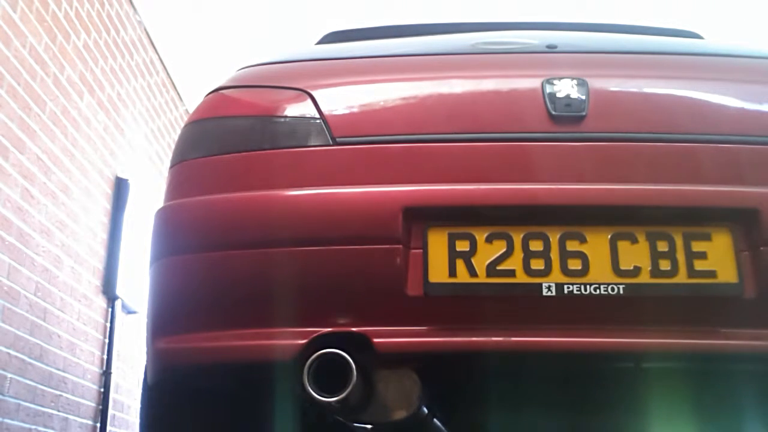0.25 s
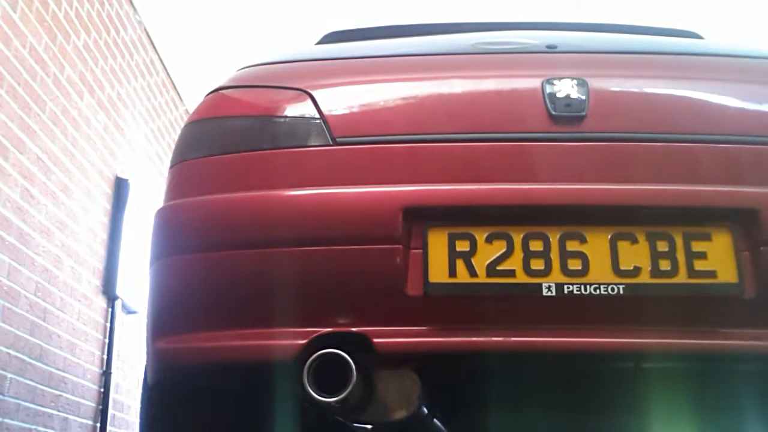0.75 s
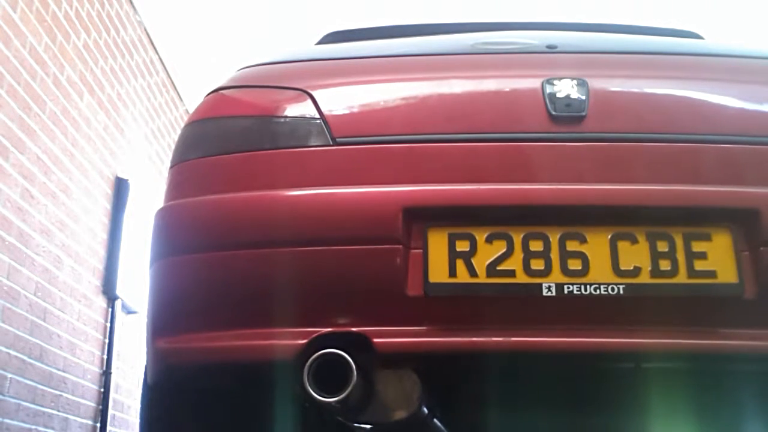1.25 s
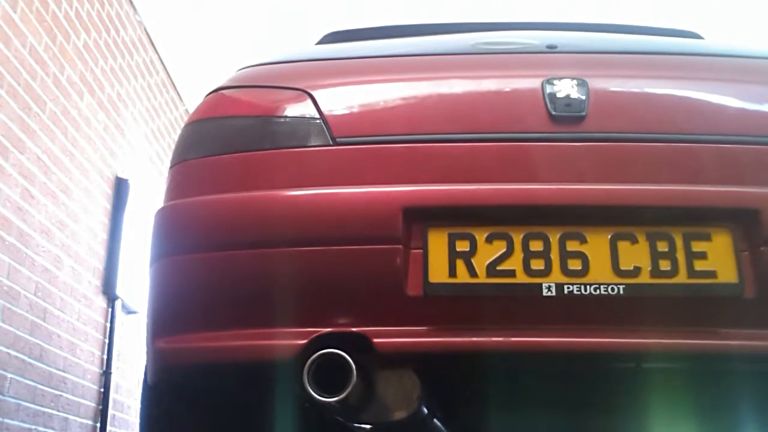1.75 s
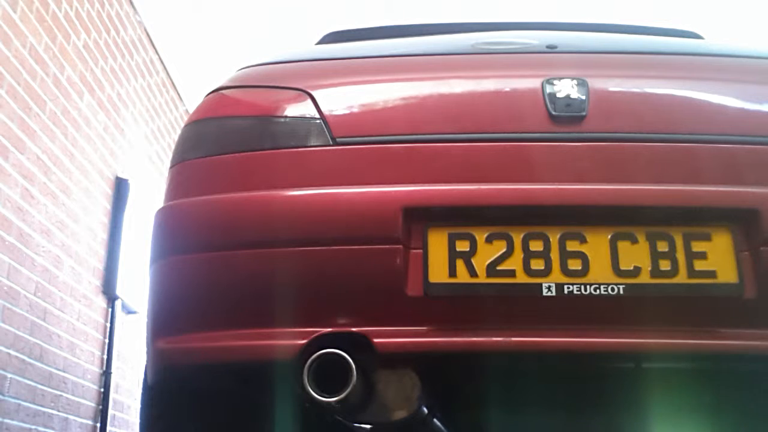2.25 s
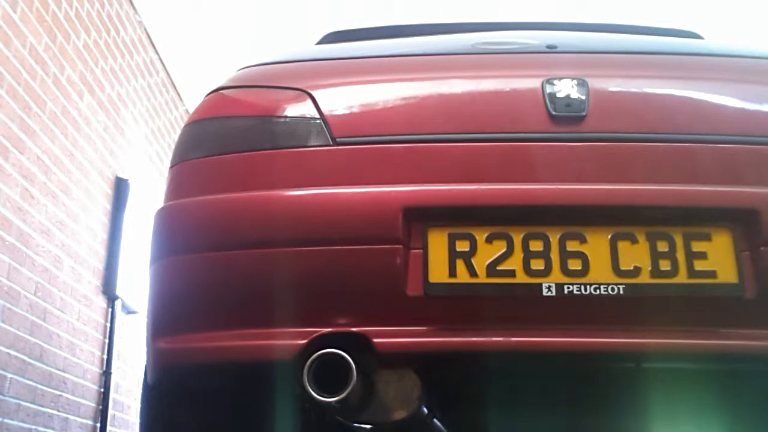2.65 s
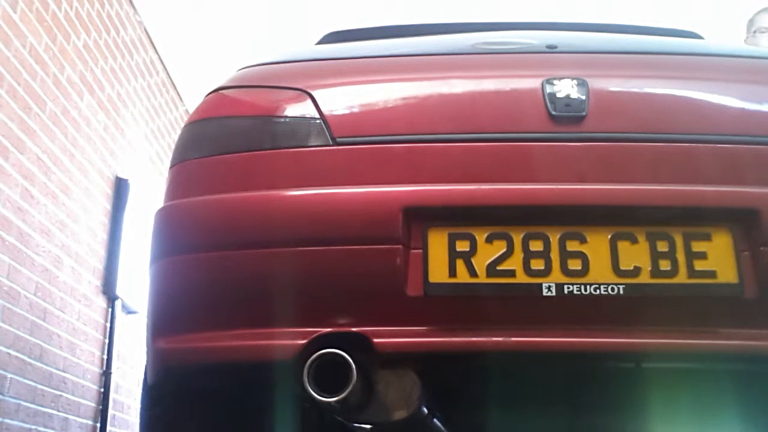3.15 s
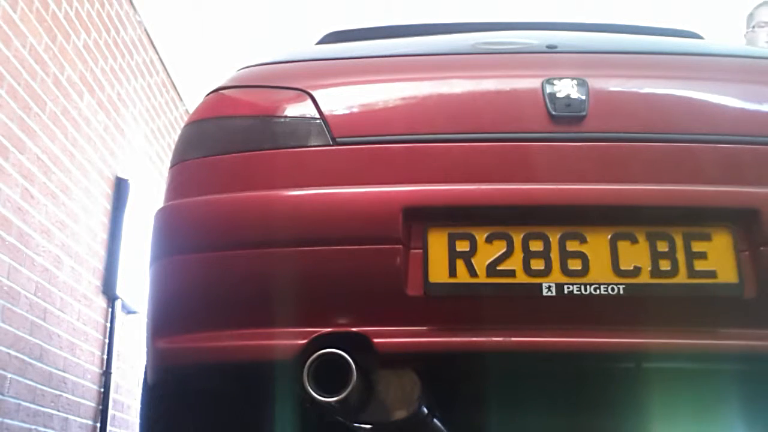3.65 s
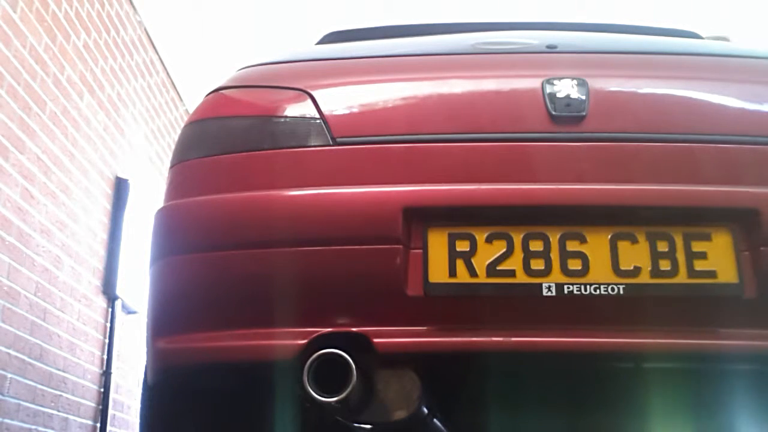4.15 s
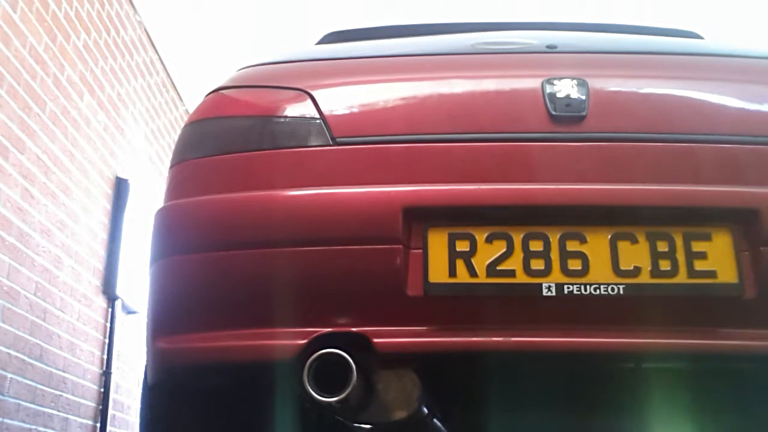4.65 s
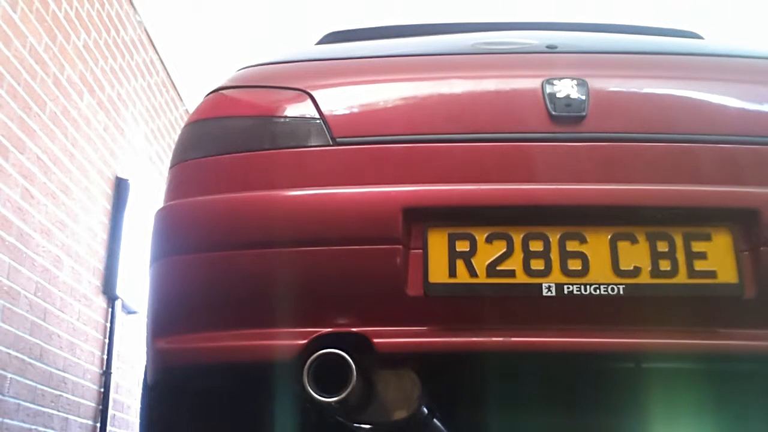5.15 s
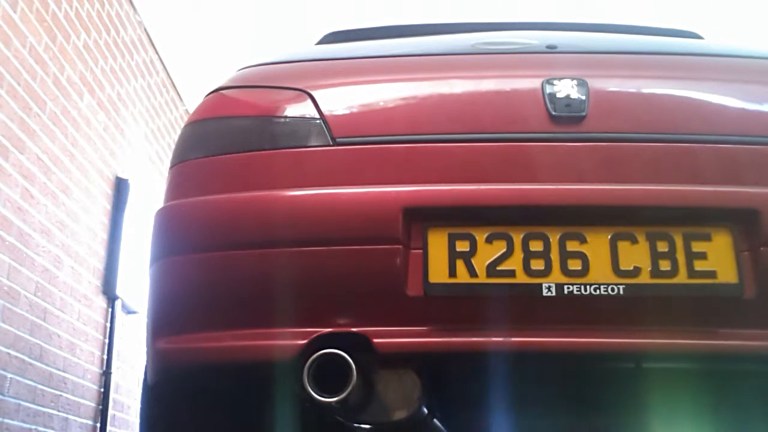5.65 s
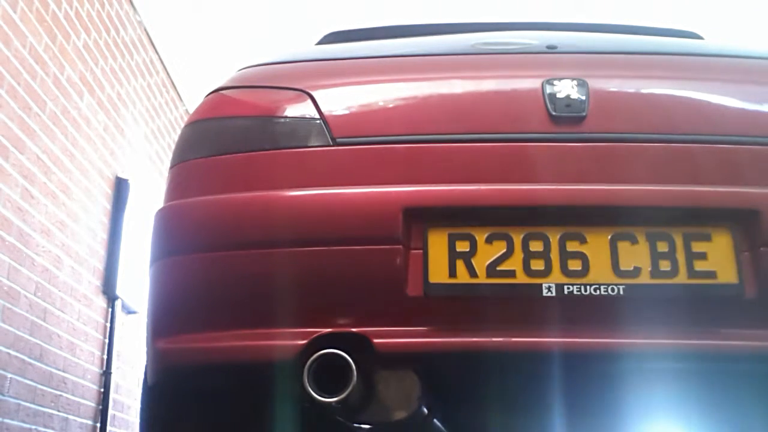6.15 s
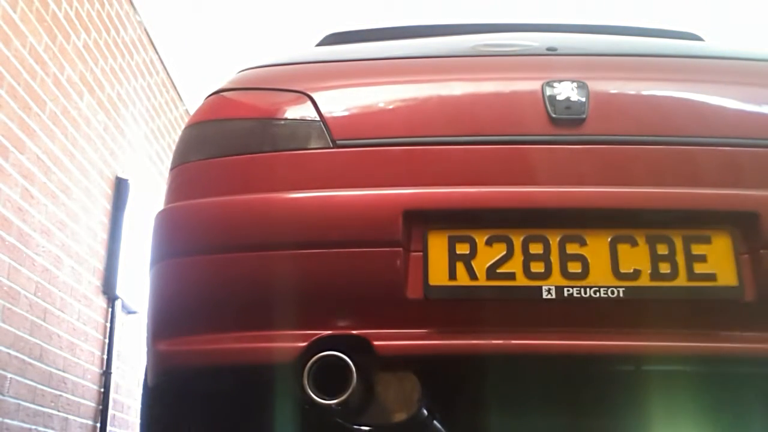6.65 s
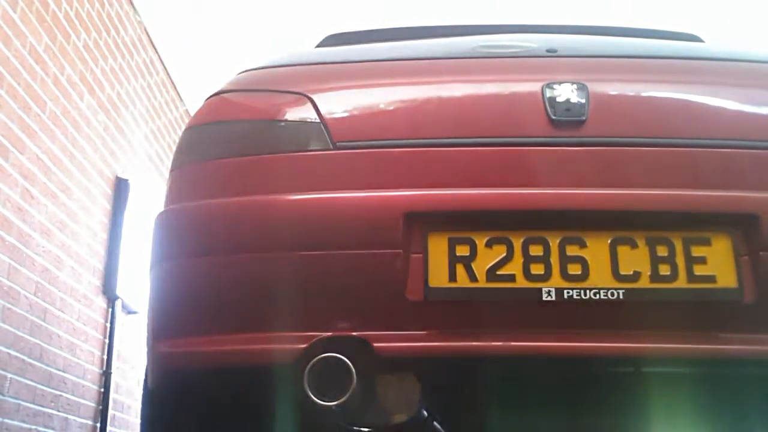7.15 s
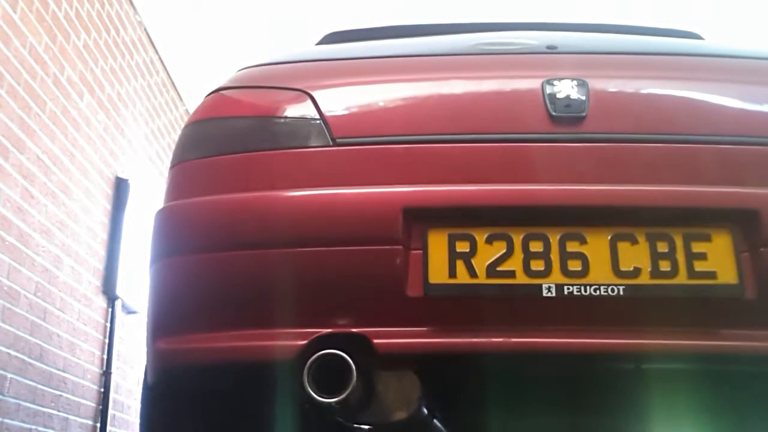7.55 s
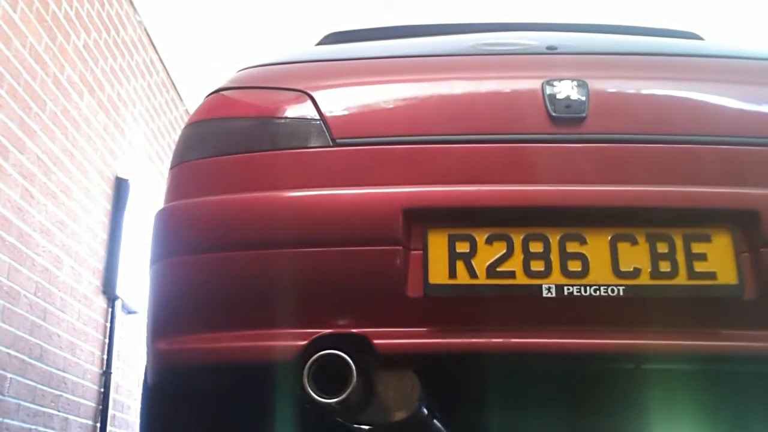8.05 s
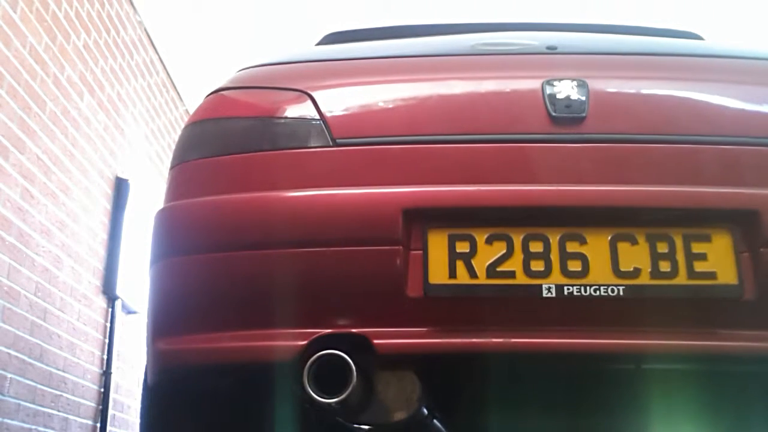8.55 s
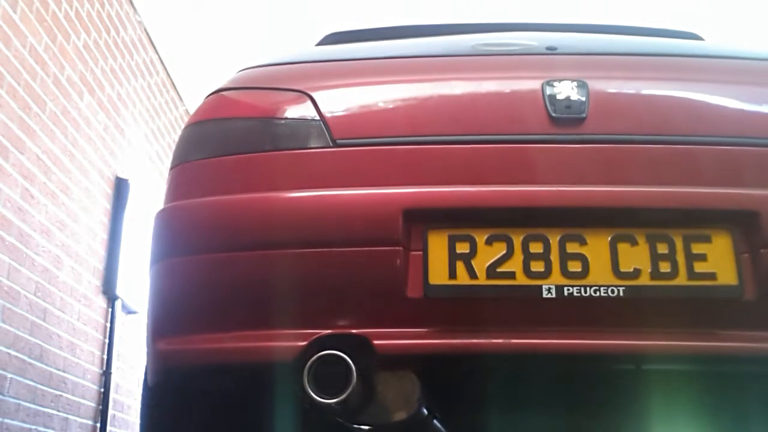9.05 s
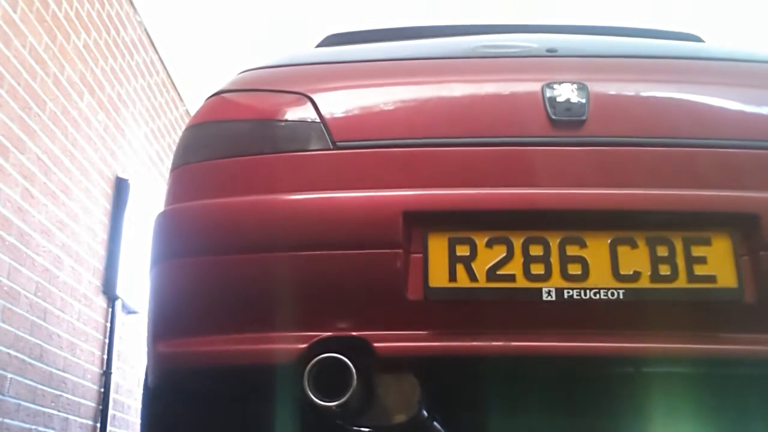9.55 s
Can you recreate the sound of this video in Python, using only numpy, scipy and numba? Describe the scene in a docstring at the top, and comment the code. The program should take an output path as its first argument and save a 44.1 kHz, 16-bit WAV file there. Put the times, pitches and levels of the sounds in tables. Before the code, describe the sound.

A starter motor labours with gritty gear whine, then short exhaust pops merge into a running engine. It flares mildly, drops to an even, bassy, puttering idle with soft gas hiss and faint valve rattle, then leaps into a harsh raspy rev, winds down, and climbs a second time. Microphone right behind the exhaust by a wall, clipping on the loudest bursts; slight stereo spread.

```python
"""The exhaust of a small four-cylinder car, close behind its tailpipe beside a brick wall: it catches, flares,
idles and is revved twice. Each firing is a pulse that feeds tuned bands and rings the exhaust; sine lines add growl.
Gas and valve gear are ringing noise that throbs with the firings. Before that a starter cranks: noise in strokes.
The level jumps up briefly; the loudest parts overload the microphone input, and gain control pulls the level down."""
import sys
import numpy as np
from scipy import signal
from scipy.io import wavfile
from scipy.ndimage import uniform_filter1d
from numba import njit

SR = 44100
rng = np.random.default_rng(int(sys.argv[2]) if len(sys.argv) > 2 else 0)


def master_out(mix):
    """Clip the mix to full scale and print it as 16-bit PCM to the path in sys.argv[1]."""
    frames = np.transpose(np.atleast_2d(mix))
    ceiling = np.clip(frames, -1, 1)
    pcm = np.round(ceiling * 32767).astype(np.int16)
    wavfile.write(sys.argv[1], SR, pcm)


N = 432621
ONE = np.ones(N)
T = np.arange(N) / SR  # time in seconds


def undb(db):
    """Decibels to gain."""
    return 10 ** (np.asarray(db) / 20)


def unit(x):
    """Scale to rms 1."""
    return x / np.sqrt(np.mean(x ** 2))


@njit
def svf(x, hz, width):
    """State-variable band-pass with moving centre and width, gain 1 at the centre."""
    y, band, low = np.empty(len(x)), 0., 0.
    for i in range(len(x)):
        g, k = np.pi * hz[i] / SR, width[i] / hz[i]
        g += g ** 3 / 3  # close to the tangent that a digital filter needs
        v = (band + g * (x[i] - low)) / (1 + g * (g + k))
        band, low, y[i] = 2 * v - band, low + 2 * g * v, k * v
    return y


@njit
def follow(x, attack, release):
    """Level follower with separate rise and fall, each a share of the gap per sample."""
    level, out = 0., np.empty(len(x))
    for i in range(len(x)):
        level += (x[i] - level) * (attack if x[i] > level else release)
        out[i] = level
    return out


def fixed_band(x, hz, width):
    """Band-pass that stays at one pitch."""
    return svf(x, hz * ONE, width * ONE)


def band_noise(hz, width):
    """Noise in one fixed band, rms 1."""
    return unit(fixed_band(rng.standard_normal(N), hz, width))


def low_pass(x, order, hz):
    """Take away the treble above a pitch."""
    return signal.sosfilt(signal.butter(order, hz, fs=SR, output="sos"), x)


def dull(x):
    """The tailpipe passes little of a snap's treble."""
    return low_pass(x, 4, 2900)


def ring(x, modes):
    """Sum of resonances, neighbours in opposite phase."""
    total = 0
    for k, (hz, width, db) in enumerate(modes):
        total = total + (-1) ** k * undb(db) * fixed_band(x, hz, width)
    return total


def columns(rows):
    """Table columns joined by straight lines in time."""
    s, *cols = np.transpose(rows)
    return [np.interp(T, s, c) for c in cols]


def passed_db(hz, table):
    """How strongly a pitch gets through, read between the table's points on a log pitch scale."""
    table_hz, table_db = np.transpose(table)
    return np.interp(np.log(hz), np.log(table_hz), table_db)


def walk(rate):
    """Slow random wander, spread near 1."""
    k = int(SR / rate)
    steps = np.repeat(rng.standard_normal(N // k + 1), k)
    return 2.1 * uniform_filter1d(uniform_filter1d(steps, k), k)[:N]


def swell(s, rise, until, fade):
    """Rises to 1 at s, holds, then dies away."""
    return np.clip(1 + (T - s) / max(rise, .001), 0, 1) * np.exp(-np.maximum(T - until, 0) / fade)


WALL_LAG_S = .00045


def hiss(modes, shared, pan_db):
    """Noise in resonances for two ears; part of it is common and reaches the left a little late."""
    common, left, right = (unit(ring(rng.standard_normal(N), modes)) for _ in range(3))
    share = np.clip(shared, 0, 1)
    late = np.roll(common, int(WALL_LAG_S * SR))
    pair = np.sqrt(share) * np.array([late, common]) + np.sqrt(1 - share) * np.array([left, right])
    return pair * undb([[pan_db / 2], [-pan_db / 2]])


# The running engine. Each row: time in seconds, firing rate in Hz, then levels in dB of the note,
# the tailpipe rasp and the gas hiss.
RUN = [(1.09, 36.78, -4, -37, -30), (1.22, 45.77, -3, -30.5, -31), (1.35, 48.57, -4.5, -35, -33),
       (1.59, 51.46, -5, -36, -35), (1.85, 48.03, -4, -35, -34.5), (2.08, 43.74, -2, -37.5, -35),
       (2.41, 35.87, 0, -35.5, -33), (2.6, 31, 3, -45, -39), (2.74, 27.73, -5, -47, -37.5),
       (2.95, 28.12, -8, -45.5, -38), (3.3, 28.58, -1, -44.5, -38), (4.5, 29.52, 2, -44, -37.5),
       (6.37, 28.91, -0.5, -44.5, -36.5), (6.55, 30.07, 3, -44, -34.5), (6.65, 35.55, -1, -41.5, -38),
       (6.69, 38.13, -7.5, -30, -28), (6.81, 62.5, -1.5, -28, -30), (6.99, 108.6, -0.5, -22, -28),
       (7.09, 137.3, 1, -18.5, -28), (7.17, 160.2, -3.5, -23.5, -34.5), (7.28, 194.3, 10.5, -12.5, -27),
       (7.39, 206.9, 0, -18, -28), (7.45, 201.8, -5.5, -38, -27.5), (7.5, 198, -3, -21, -20),
       (7.62, 185.5, -4.5, -21, -20.5), (7.75, 176.5, -8.5, -22.5, -22.5), (7.98, 153.5, -1, -24.5, -23),
       (8.15, 142.6, -4, -24, -27), (8.27, 133.7, -2, -25, -24), (8.45, 119.3, -0.5, -23, -24.5),
       (8.61, 110.4, -1, -25, -24), (8.75, 99.7, -7.5, -32.5, -27), (8.95, 91.15, -4, -41, -26.5),
       (9.01, 91.75, -5.5, -19.5, -32), (9.14, 123.3, -2.5, -31, -29), (9.26, 156.9, 7, -17.5, -32.5),
       (9.38, 190.3, 7.5, -12, -26.5), (9.46, 210.1, 0, -16, -31.5), (9.59, 240.8, 1, -12.5, -29),
       (9.7, 239, -6, -19.5, -24), (9.81, 225, 2.5, -20, -18)]
# The balance at each speed. Each row: firing rate in Hz, tilt in dB an order, waver of the orders in dB,
# then levels in dB: half orders, silencer, valve gear above gas, buffeting, thump.
BY_SPEED = [(28.3, 1.5, .5, -25.5, -23, -10, -61, -48), (29.41, -1.5, 0.53, -35.5, -23.5, -7.5, -62.5, -45),
            (37.7, -1.5, .5, -23, -18.5, -11.5, -58, -39), (43.8, 0, .5, -36.5, -25.5, -10, -55, -25.5),
            (51, -2.5, .5, -46.5, -21, -8.5, -44, -28), (93, -1.5, 1.5, -22, -47, -8, -33.5, -44),
            (131, -2.5, 1, -30.5, -19, -5, -42, -45), (177, -5, 1.5, -20.5, -20, 2, -54, -53),
            (247.16, -5, 2.5, -16.5, -22, -0.5, -33, -54)]
# How the lines swell and fade. Each row: time in seconds, then changes in dB of the first, second, third
# and fourth order, the higher orders and the half orders.
LINES = [(1.2, 1, 0.5, -5, -8, 0, 6.5), (1.4, 3, 1.5, 1.0, -0.5, -5, 2.5), (1.6, -0.5, 3, 3.5, -2, 3, -1.0),
         (1.8, 4, 4, -2.5, -3.5, -12, 8), (2.0, -1, 1.0, -6, -9, -1.5, 6),
         (2.15, 1.0, 1.5, -2, -4, 8.5, 8.5), (2.3, 3, 1, 4.5, -5, 4, 1.5), (2.45, -0.5, 1.5, -3, 3, 3, 0),
         (2.6, 2, 2, 0, -6, -1.5, -4), (2.8, 3.5, 3, 1.5, 1.5, -1.5, -4), (3.0, 1.5, 5, 2.5, 4.5, -6, -1),
         (3.3, 4, 3, -0.5, 1, 2.5, -3.5), (4.5, -1, 2.0, 0, 1, 0, -0.0), (6.4, -1, 4.5, 0, 0.5, -2.5, 0),
         (6.75, -0.0, 1, -1, -4, 1, 3), (6.82, 7, -1, -4.5, -5, 3, -6), (6.89, -0.5, 3, 5, 1.0, -11, 4),
         (6.96, 1.5, 2.5, -1.5, 1.0, 0, -4), (7.03, 4, 3.5, -2.5, -6, 3, -2), (7.1, 1, 6.5, 2.5, -4, 0, -7),
         (7.17, 3.5, -6, 2, -11, 4, -22), (7.24, 0.5, 0, 6.5, 11.5, -3.0, 0), (7.31, -0.5, 4, 4, 1, 1.0, 7),
         (7.38, -1.5, 0, 9, 2, 1, 3.5), (7.45, 0.5, -3, 2.0, 2.5, 1, -9), (7.52, 1, 1, -11, 1.5, -2, 3),
         (7.59, -8, 2, -1.0, 2, 1.5, 3), (7.66, -0.5, -2.5, 3, 11, 1.0, 0), (7.73, 2.5, 8, 0, 2, 0, 4),
         (7.8, -4, 5, 6, 13, -1.5, 0), (7.87, -0.5, -1.5, -0.5, -4.0, -4, -0.5),
         (7.94, 0.5, -5.5, -7.5, -8.5, -10, -2.0), (8.01, 0, -12.5, -2, -9.5, 1, -10),
         (8.08, 1, -12.0, 0, -7.5, 3, -9), (8.15, 1, -10, 7, -7, 2, -19), (8.22, 0, 0, 8, -1.5, 3, -6),
         (8.29, 4, 4.5, 8, 4, -1.0, -3), (8.36, -1.0, -1, -6.5, -13, -4, 3),
         (8.43, 2, 0.5, -6, -7.5, -2.5, 4), (8.5, 6.5, -3.0, -2, -6.5, -1, 0),
         (8.57, -1.0, 3, -6, -6, -3.0, -8), (8.64, -5, 2, 0, 7, 0.5, 1), (8.71, -1, 7.5, -4, -4.0, -11, -5),
         (8.78, -0.5, 6, 0, 5.5, -2, 1.5), (8.85, 1, -1, -6, 2, -7, -0.5), (8.92, 1, 2.5, -1, -7, -7, -4.5),
         (8.99, 0.5, 0, 5.5, 3.5, -4, -4), (9.06, 0, 0, 8, 1, -2.5, -1.5), (9.13, 3, 5.5, -3.5, 7, 2, -4.5),
         (9.2, -1.5, 3, 5.5, -1.5, -4, 0), (9.27, 0.5, -3, -4, -2, -3, -2),
         (9.34, 4.5, 4.5, 4.5, 14, -3.0, -6.5), (9.41, -1.5, 0, 7, 3, 3.5, 0.5),
         (9.48, -1.5, -1, 12, -3.5, 6.5, -1.5), (9.55, 3.5, -10, -3, -1.5, 4, -2.0),
         (9.62, -4.5, -7, -11, -3, 9, 12), (9.69, 6, -5, -13, -6, -3, -4),
         (9.76, 0.5, 0, -12.0, -11.5, -5, -1)]
# One level in dB for each of the four cylinders.
CYLINDERS_DB = [-0.57, -1.1, 0.34, -0.59]
# The two edges in Hz of the band of the thump.
THUMP_HZ = [225, 357]
FIRST_TURN_S = 1.069
ROUGH_DB, LOAD_ROUGH_DB, LOAD_PIPE_DB, BUFFET_LOAD_DB = 0.85, 1.5, -0.5, 10
UPPER_ABOVE_HZ, TICK_BELOW_HZ = 49.7, 45.5  # firing rates


def engine():
    """Each firing sends a pulse down the exhaust; returns the note, the swirl at the pipe mouth and the hiss."""
    hz, note_db, pipe_db, gas_db = columns(RUN)
    load = throttle(hz)
    speeds, *balance = np.transpose(BY_SPEED)
    at_speed = (np.interp(np.log(hz), np.log(speeds), b) for b in balance)
    tilt_db, waver_db, half_db, silencer_db, gear_db, buffet_db, thump_db = at_speed
    *swell_db, higher_db, between_db = columns(LINES)
    pipe_db = pipe_db + LOAD_PIPE_DB * load
    fast = np.clip(hz / UPPER_ABOVE_HZ - 1, 0, 1)
    slow = np.clip(2 - 2 * hz / TICK_BELOW_HZ, 0, 1)

    rough_db = np.clip(ROUGH_DB + LOAD_ROUGH_DB * load, 0, 4)
    stretch, chance = 0.0024 * rng.standard_normal(3000), rng.standard_normal(3000)
    pulses, phase = fire(hz * (T > FIRST_TURN_S), rough_db, stretch, chance, undb(CYLINDERS_DB))
    pulses = pulses * SR / hz / np.sqrt(2)  # every order then has rms 1
    turns = phase + np.cumsum(np.diff(phase, prepend=0) < 0)  # firings counted so far
    puff = np.exp(-phase / 0.27)
    crack = load * np.exp(-phase / hz / 0.0039)

    note = -low_orders(pulses, hz, load, fast, note_db, tilt_db, waver_db, swell_db)
    note = note - growl(turns, hz, load, fast, note_db + higher_db)
    note = note + half_orders(turns, hz, fast, half_db + between_db)
    # just above idle every firing leaves the pipe as one short, clean thump
    thump_band = signal.butter(2, THUMP_HZ, "band", fs=SR, output="sos")
    note = note - undb(note_db + thump_db + higher_db) * signal.sosfiltfilt(thump_band, pulses)
    note = note + pipework(pulses, hz, load, fast, puff, pipe_db, silencer_db)
    note = note + load * undb(gas_db - 23.0) * low_pass(ring(pulses, GAS), 2, 3500)
    note = note + undb(gas_db - 7.5 + 9.5 * load) * slow * load * dull(ring(pulses, CHUG))
    # the blast of gas buffets the microphone
    gust_db = buffet_db + BUFFET_LOAD_DB * load + 6.9 * np.tanh(walk(12))
    note = note + undb(gust_db) * band_noise(60, 70)

    # eddies at the pipe mouth differ from ear to ear
    swirl = undb(pipe_db - 11.5) * unit(ring(rng.standard_normal(N), PIPE))
    noise = gas_hiss(pulses, hz, load, slow, puff, crack, gas_db, waver_db)
    noise = noise + valve_gear(hz, puff, crack, gear_db + gas_db, waver_db)
    on = np.clip((T - RUN[0][0]) * 100, 0, 1)
    return on * note, on * swirl, on * noise


@njit
def fire(hz, rough_db, stretch, chance, pattern):
    """A pulse at each wrap of the phase; every firing has its own length and size."""
    pulses, phase, p, k = np.zeros(len(hz) + 1), np.empty(len(hz)), 0., 0
    for i in range(len(hz)):
        step = hz[i] * (1 + rough_db[i] * stretch[k]) / SR
        p += step
        if p >= 1:
            p, k = p - 1, k + 1
            size = pattern[k % 4] * 10 ** (rough_db[i] * chance[k] / 20)
            # share the pulse between two samples, so that it lands between them
            pulses[i] += size * p / step
            pulses[i + 1] += size * (1 - p / step)
        phase[i] = p
    return pulses[:-1], phase


# Throttle openings. Each row: opens in seconds, shuts in seconds, load from 0 to 1, fade in seconds.
THROTTLE = [(1.05, 1.1, 0.61, 0.6), (6.581, 6.63, 0.23, 0.023), (6.654, 7.403, 0.64, 0.039),
            (8.16, 8.219, 0.23, 0.029), (8.959, 9.598, 0.6, 0.054)]
IDLE_LOAD, IDLE_BELOW_HZ, OPENING_S = 0.12, 31, 0.029


def throttle(hz):
    """Load 0-1: a little at idle, none on the overrun, much while the throttle is open."""
    opened = sum(load * swell(s + OPENING_S, OPENING_S, shut, fade) for s, shut, load, fade in THROTTLE)
    return np.clip(opened + IDLE_LOAD * (hz < IDLE_BELOW_HZ), 0, 1)


# How the exhaust passes the firing orders. Each row: pitch in Hz, level in dB.
EXHAUST = [(30, -36.5), (46, -17.5), (58, -28.5), (72, -17.5), (88, -9), (100, -7), (113, -20), (128, -15),
           (150, -9), (170, -11), (190, -16.5), (225, -12), (265, -14.5), (300, -20), (340, -26.5),
           (400, -16.5), (470, -31), (525, -18), (580, -32.5), (680, -31), (760, -27.5), (830, -29),
           (900, -39), (1000, -32.5), (1150, -38), (1280, -36), (1500, -45), (1900, -52)]
MIDDLE_ORDER, LOAD_TILT_DB = 2, 5
FLUTTER_DB = .4  # an order, at full load
PATCHY_DB = 1.2


def low_orders(pulses, hz, load, fast, note_db, tilt_db, waver_db, swell_db):
    """Bands that follow one to four times the firing rate; under load the upper ones flutter more."""
    total = 0
    for k in (1, 2, 3, 4):
        db = note_db + passed_db(k * hz, EXHAUST) + swell_db[k - 1]
        db = db + (tilt_db + LOAD_TILT_DB * load) * (k - MIDDLE_ORDER)
        db = db + waver_db * walk(22) + FLUTTER_DB * k * load * walk(70)
        db = db + fast * PATCHY_DB * min(k - 1, 1) * walk(35)  # none on the first order
        total = total + undb(db) * svf(svf(pulses, k * hz, 0.53 * hz), k * hz, 0.55 * hz)
    return total


UPPER_DB, UPPER_LOAD_DB = -4, 10.5
UPPER_FALL_DB = -1  # an order
BLUR_RAD = .09


def growl(turns, hz, load, fast, level_db):
    """At speed a fan of upper orders growls, patchy and blurred, strongest under load."""
    total = 0
    for k in range(5, 11):
        db = level_db + passed_db(k * hz, EXHAUST) + UPPER_DB + UPPER_FALL_DB * (k - 5)
        db = db + UPPER_LOAD_DB * load + PATCHY_DB * walk(45)
        blurred = 2 * np.pi * turns + BLUR_RAD * walk(90)
        total = total + fast * undb(db) * np.sqrt(2) * np.cos(k * blurred)
    return total


# Lines half-way between the orders. Each row: multiple of the firing rate, level in dB.
HALF_ORDERS = [(.5, -8.5), (1.5, 5), (2.5, 4), (3.5, 8.5), (4.5, -6.5), (5.5, 2), (6.5, -4.5), (7.5, -14)]
# How the pipework passes those lines. Each row: pitch in Hz, level in dB.
BRANCH = [(40, -22.5), (75, -8.5), (102, 1.5), (130, -6), (160, 0), (190, -3), (220, -2), (290, -5.5),
          (345, -26), (420, -6), (480, -20), (525, -6.5), (570, -27), (670, -20), (900, -34)]


def half_orders(turns, hz, fast, level_db):
    """Every other firing travels a longer manifold branch, which adds lines half-way between the orders."""
    total = 0
    for k, line_db in HALF_ORDERS:
        db = level_db + line_db + passed_db(k * hz, BRANCH) + 1.6 * walk(8) + fast * PATCHY_DB * walk(35)
        blurred = 2 * np.pi * turns + BLUR_RAD * walk(70)
        total = total + undb(db) * np.sqrt(2) * np.sin(k * blurred)
    return total


# Rings of the silencer, then of the tailpipe. Each row: pitch in Hz, width in Hz, level in dB.
SILENCER = [(149, 29, -3.5), (213.2, 22.5, -2), (239.5, 15.8, 0.5), (283.5, 16.5, 0.5)]
PIPE = [(399, 34, 5), (495.6, 92, 2), (606, 138, -2), (686, 58, -2.5)]


def pipework(pulses, hz, load, fast, puff, pipe_db, silencer_db):
    """Pulses, partly broken up into turbulence, ring the silencer and the tailpipe."""
    # slow flow breaks up; hard flow tears as well
    broken = np.clip(21 / hz, 0, 1) * (1 - load) + 0.34 * load
    turbulence = np.sqrt(SR / hz) * (0.51 + 0.98 * puff) * rng.standard_normal(N)
    flow = np.sqrt(1 - broken) * pulses + np.sqrt(broken) * turbulence
    into_silencer = pulses + np.clip(0.29 + 0.5 * fast, 0, 1) * (flow - pulses)
    return undb(silencer_db) * ring(into_silencer, SILENCER) + undb(pipe_db) * dull(ring(flow, PIPE))


# Rings of the gas hiss, then of a sharp firing at the pipe mouth.
# Each row: pitch in Hz, width in Hz, level in dB.
GAS = [(815, 620, 2), (1287, 10, 9.5), (1260, 360, -31.5), (2270, 2140, -3.5)]
CHUG = [(680, 220, 7), (1260, 370, -9.5), (2080, 250, -2)]
TICK_DB, TICK_S = -3.5, 0.0045


def gas_hiss(pulses, hz, load, slow, puff, crack, gas_db, waver_db):
    """Gas hisses once a firing; at low speed each firing also leaves a short tick at the pipe mouth."""
    throb = 1.0 + .5 * puff + 2.43 * crack
    gas = undb(gas_db + 0.74 * waver_db * walk(7.6)) * throb * hiss(GAS, 0.25, 3.8)
    kick = follow(pulses * hz / SR, 1., 1 / (TICK_S * SR)) * slow
    tick_db = gas_db + TICK_DB + 14 * load + 2.5 * walk(30)
    gas = gas + undb(tick_db) * dull(kick * hiss(CHUG[1:], 0.61, 2))
    return low_pass(gas, 2, 4500)


# Rings of the valve gear, then of the hiss at speed: narrow whistling rings over a broad rush of gas.
# Each row: pitch in Hz, width in Hz, level in dB.
GEAR = [(4040, 245, 7.5), (4700, 220, -3), (5530, 380, 4), (4530, 10300, -5)]
SPEED_HISS = [(2280, 80, 5), (2470, 83, 12), (2350, 1050, 3.5), (3805, 93, 10.5), (3930, 1100, 2),
              (4880, 60, 10.5), (5414, 270, 7.5), (5468, 600, -2), (7630, 61000, -2.5)]


def valve_gear(hz, puff, crack, gear_db, waver_db):
    """Valve gear hisses once a firing; at speed whistling rings over a broad rush of gas take its place."""
    level = undb(gear_db + 0.27 * waver_db * walk(11)) * (1.04 + .5 * puff + 1.9 * crack)
    at_speed = np.clip((hz - 50) / 90, 0, .95)
    mix = np.sqrt(1 - at_speed) * hiss(GEAR, 0.045, -5.0)
    mix = mix + np.sqrt(at_speed) * hiss(SPEED_HISS, 0.081, -3.0)
    return low_pass(level * mix, 4, 8000)


# Sudden jumps in the level, ahead of the clipping. Each row: start in seconds, length in seconds,
# boost in dB at the start, level of the tearing noise in dB.
LEVEL_JUMP = [(6.879, 0.031, 12, -25.5), (7.051, 0.029, 14.5, -16), (7.111, 0.032, 18.5, -22),
              (7.196, 0.071, 15, -15), (7.41, 0.024, 16.5, -15), (9.076, 0.066, 14, -19.5),
              (9.162, 0.099, 18, -12), (9.287, 0.073, 11, -13), (9.372, 0.075, 10, -10),
              (9.478, 0.093, 14, -11.5), (9.78, 0.045, 12, -29)]
JUMP_SAG = 0.29  # share of the boost lost by the end of a jump


def level_jumps():
    """Gain that jumps up, sags and drops back."""
    db = 0
    for s, length, boost_db, _ in LEVEL_JUMP:
        db = db + boost_db * (1 - JUMP_SAG * (T - s) / length) * ((T >= s) & (T < s + length))
    return undb(uniform_filter1d(db, size=88))


# Rings of the gas tearing in a level jump. Each row: pitch in Hz, width in Hz, level in dB.
BLAT = [(880, 1100, 1), (1310, 320, 0), (1740, 710, -12)]
TEAR_S = 0.075


def tearing():
    """Torn gas, as ringing noise, barks at the start of each level jump and thins out."""
    bark = sum(undb(db) * swell(s, 0.0026, s, TEAR_S) * (T < s + length) for s, length, _, db in LEVEL_JUMP)
    return bark * undb(1.6 * walk(60)) * hiss(BLAT, 0.53, 2)


# The first single firings. Each row: time in seconds, strength of the bang in dB, spit of gas in dB.
CATCH = [(.917, -5, 0.5), (0.964, -6.5, -1), (0.999, -6, -3), (1.032, -6.5, -11), (1.051, -8, -11),
         (1.091, -5, -6)]
SPIT_LAG_S, SNAP_DB = 0.00523, 17.5


def catch():
    """Lone bangs ring the pipe, each followed by a snap and a spit of gas."""
    blows = struck([row[:2] for row in CATCH], unit(np.hanning(150)) / 90)
    boom = undb(52.5) * fixed_band(blows, 95, 30) + undb(38) * ring(blows, SILENCER)

    def late(shape):
        """The shape at each firing, a little after the bang."""
        return np.roll(struck([row[::2] for row in CATCH], shape), int(SPIT_LAG_S * SR))

    snap = undb(SNAP_DB) * ring(late(ONE[:1]), CHUG)
    spit_noise = undb(-12.5) * hiss(CHUG, 0.65, 1.5) + undb(-8.0) * hiss(PIPE, 0.22, 1.8)
    spit = late(np.exp(-T[:3000] / 0.0071)) * spit_noise
    return -boom + dull(snap + spit)


def struck(events, shape):
    """One copy of a shape at each (s, dB) row."""
    blows = np.zeros(N)
    for s, db in events:
        blows[int(s * SR)] = undb(db)
    return signal.fftconvolve(blows, shape)[:N]


# The starter labouring over each compression. Each row: time of full strength in seconds, rise in seconds,
# gear noise in dB, motor drone in dB, pipe puff in dB, grind above gear noise in dB, starting grind pitch in Hz.
STROKE = [(0.0, 0.0024, -22.5, -37, -69, -5, 1980), (0.28, 0.062, -34.5, -37, -67, 8.5, 1010),
          (0.34, 0.035, -31.5, -26, -30, 3, 1050), (0.511, 0.0029, -26, -45, -42, -6, 1270),
          (0.574, 0.036, -41, -37, -56, 1, 595), (0.677, 0.0036, -24, -45, -36, -8, 1130),
          (.825, 0.0047, -23.5, -43, -36, -4.5, 1680)]
# Rings of the starter's gears. Each row: pitch in Hz, width in Hz, level in dB.
STARTER = [(523, 290, 0.5), (790, 31, 9.5), (958, 91, 3), (1310, 190, 1), (1570, 170, 1),
           (2340, 1020, -5.5), (3700, 810, -3.5), (4800, 2860, -9)]
# A faint hum while the starter turns. Each row: pitch in Hz, level in dB.
CRANKING_HUM = [(118, -41), (175, -38.5)]
GEAR_FLOOR_DB, DRONE_FLOOR_DB, PUFF_FLOOR_DB = -29, -37, -50
GEAR_FADE_S, DRONE_FADE_S, PUFF_FADE_S, HOLD_S = 0.033, 0.048, 0.083, 0.032
RELEASED_DB, RUN_DOWN_S = -22.5, 0.22
GRIND_WIDTH, GRIT_DB = 0.065, 1  # width as a share of the pitch
GRIND_SAG = 0.45  # share of pitch lost a second as a stroke slows


def starter():
    """Gear noise, motor drone and dull puffs swell with each compression, over a faint hum."""
    def strokes(column, floor_db, fade):
        """A steady floor plus one swell for each compression."""
        swells = (undb(row[column]) * swell(row[0], row[1], row[0] + HOLD_S, fade) for row in STROKE)
        return undb(floor_db) + sum(swells)

    first_bang = CATCH[0][0]
    cranking = T < first_bang
    puffs = strokes(4, PUFF_FLOOR_DB, PUFF_FADE_S) * band_noise(85, 40)
    drone = strokes(3, DRONE_FLOOR_DB, DRONE_FADE_S) * hiss([(282, 19, 1.5), (203, 15, -7)], 0.91, 2.1)
    hum = sum(undb(db) * np.sin(2 * np.pi * hz * T) for hz, db in CRANKING_HUM)
    run_down = undb(RELEASED_DB) * np.exp(-(T - first_bang) / RUN_DOWN_S)
    effort = np.where(cranking, strokes(2, GEAR_FLOOR_DB, GEAR_FADE_S), run_down)
    whine = low_pass(hiss(STARTER, 0.069, 0.89), 2, 6500)

    starts, *tone = np.transpose([(row[0] - row[1], *row[-2:]) for row in STROKE])
    stroke_now = np.clip(np.searchsorted(starts, T) - 1, 0, None)
    grind_db, grind_hz = (c[stroke_now] for c in tone)
    stroke_began = np.maximum.accumulate(T * (np.diff(grind_hz, prepend=0) != 0))
    grind_hz = grind_hz * (1 - GRIND_SAG * (T - stroke_began) * cranking)
    grind = unit(svf(rng.standard_normal(N), grind_hz, GRIND_WIDTH * grind_hz))
    grind = undb(grind_db) * grind * cranking
    gears = effort * whine + (effort - undb(GEAR_FLOOR_DB)) * grind
    return undb(GRIT_DB * walk(150)) * gears + cranking * (puffs + drone + hum)


# Brief thuds and rasps. Each row: start in seconds, length in seconds, pitch in Hz, width in Hz, level in dB.
RASP = [(-0.04, 0.095, 800, 300, -22), (-0.03, 0.074, 2000, 400, -23), (0.82, 0.48, 5350, 1900, -31.5),
        (7.44, 0.24, 150, 13, -18), (8.072, 0.046, 70, 80.1, -17), (8.115, 0.13, 2310, 580, -21.5),
        (8.126, 0.17, 3870, 500, -26), (7.58, 0.19, 1260, 41, -29), (8.222, 0.47, 1298, 24, -25),
        (8.52, 0.2, 929, 25, -24)]


def rasps():
    """Short swells of narrow or broad hiss."""
    total = 0
    for s, length, hz, width, db in RASP:
        bump = np.sin(np.pi * np.clip((T - s) / length, 0, 1)) ** 2
        total = total + undb(db) * bump * hiss([(hz, width, 0)], 0.23, 1.4)
    return total


SKEW_S, SKEW_DB = 0.0018, -16


def scene():
    """The note is nearly alike in both ears; the wall leans its upper part left, bass right, and skews its phase."""
    note, swirl, noise = engine()
    push = level_jumps()
    note = note * push
    lean = 0.2 * fixed_band(note, 500, 500) - 0.056 * fixed_band(note, 70, 50) + 0.041 * fixed_band(note, 150, 80)
    skew = np.roll(note, int(SKEW_S * SR)) - np.roll(note, -int(SKEW_S * SR))
    side = lean + undb(SKEW_DB) * skew + push * swirl
    exhaust = np.array([note + side, note - side]) + noise * push ** 0.85
    return exhaust + tearing() + catch() + starter() + rasps()


INPUT_TOP, TOP_HZ = 1., 15400
KNEE, RATIO, ATTACK_S, RELEASE_S = 0.3, 7, 0.12, 0.013


def record(dry):
    """The input clips hard, gain control follows the clipped level, the top is cut."""
    # the capsule misses the deepest bass
    dry = signal.sosfilt(signal.butter(2, 30, "high", fs=SR, output="sos"), dry)
    hardness = 13.0
    clipped = dry / (1 + np.abs(dry / INPUT_TOP) ** hardness) ** (1 / hardness)
    power = uniform_filter1d(np.mean(clipped ** 2, axis=0), size=441)
    loud = np.sqrt(follow(power, 1 / (ATTACK_S * SR), 1 / (RELEASE_S * SR)))
    gain = (KNEE / np.maximum(loud, KNEE)) ** (1 - 1 / RATIO)
    return signal.sosfilt(signal.ellip(8, .2, 80, TOP_HZ, fs=SR, output="sos"), clipped * gain)


dry = scene()
out = record(dry)
master_out(out)
```